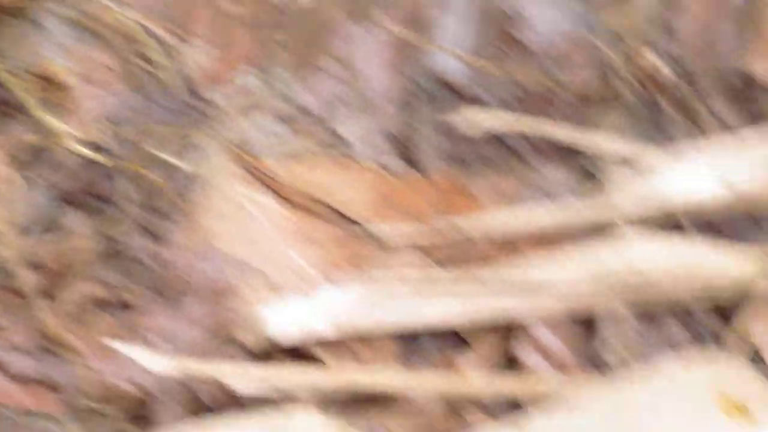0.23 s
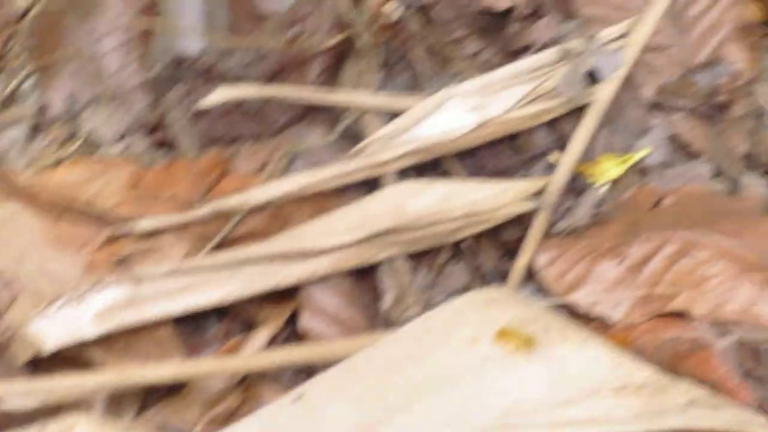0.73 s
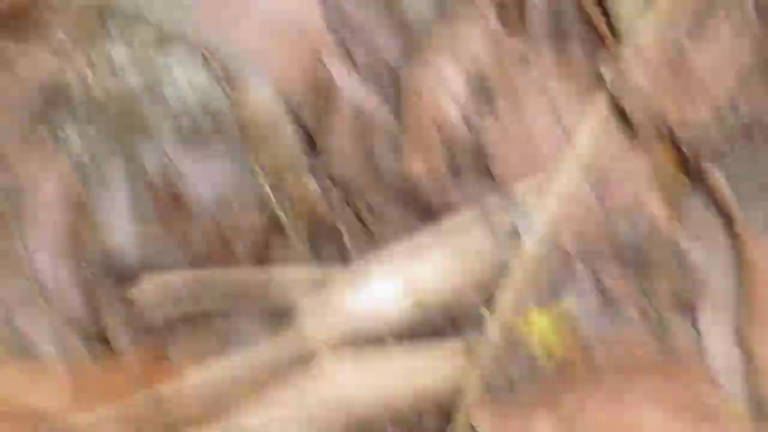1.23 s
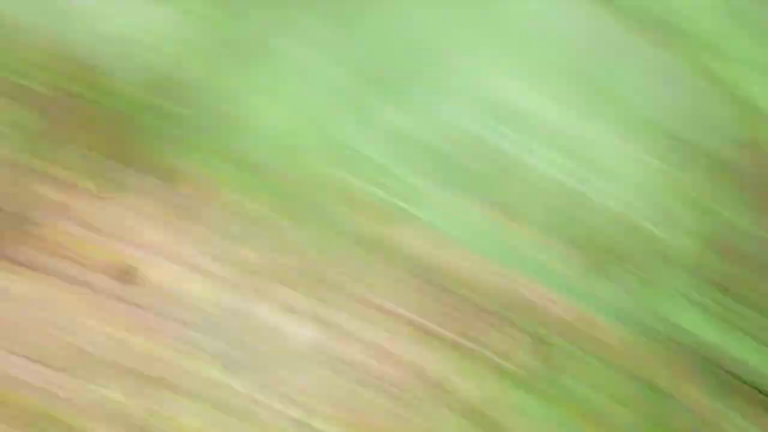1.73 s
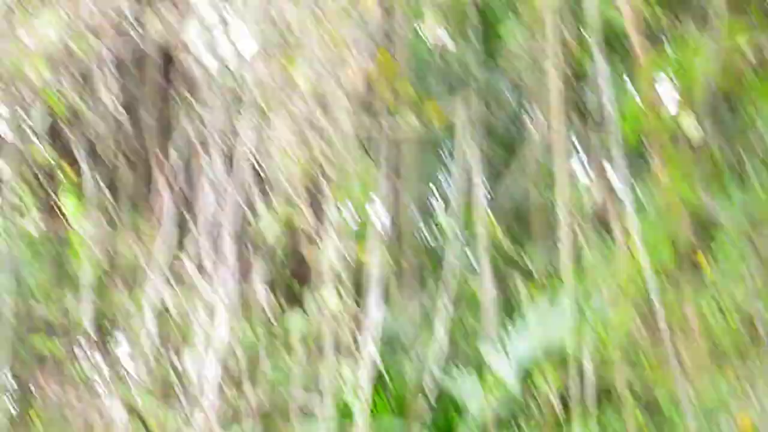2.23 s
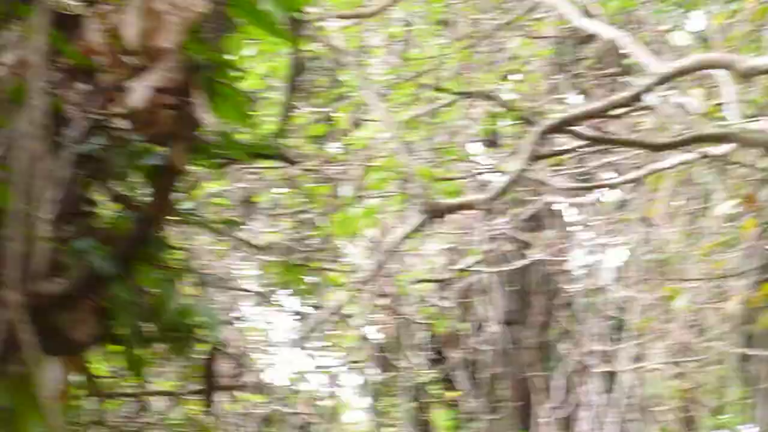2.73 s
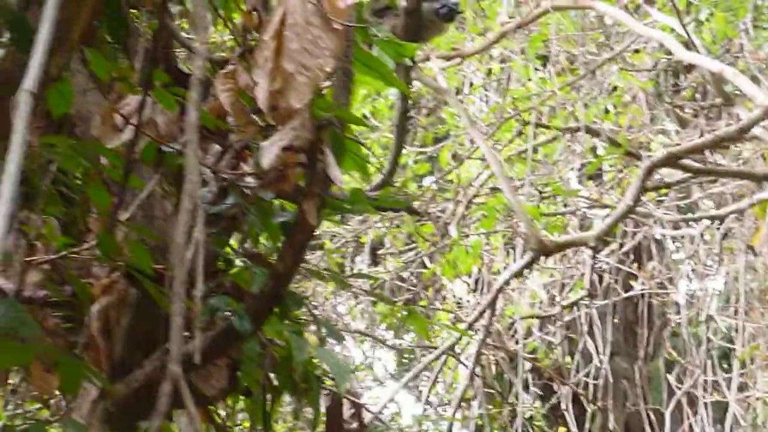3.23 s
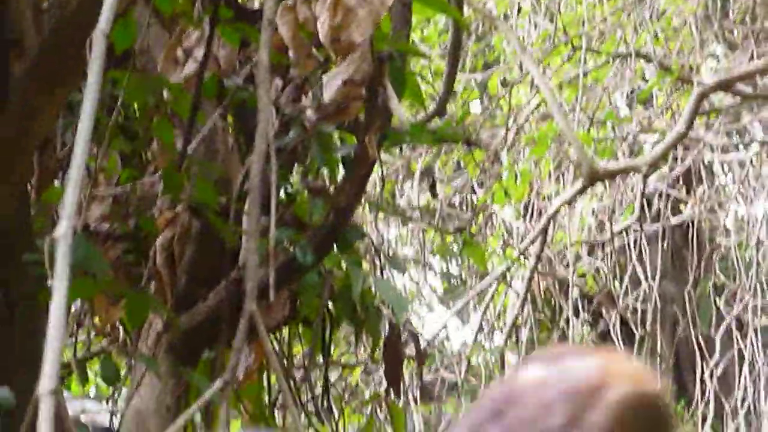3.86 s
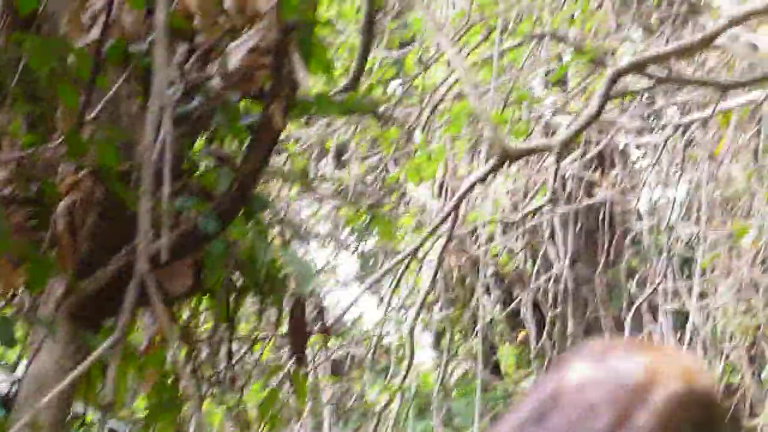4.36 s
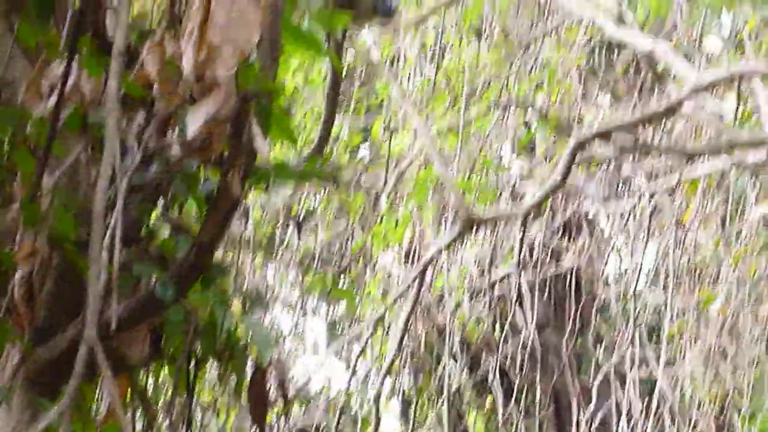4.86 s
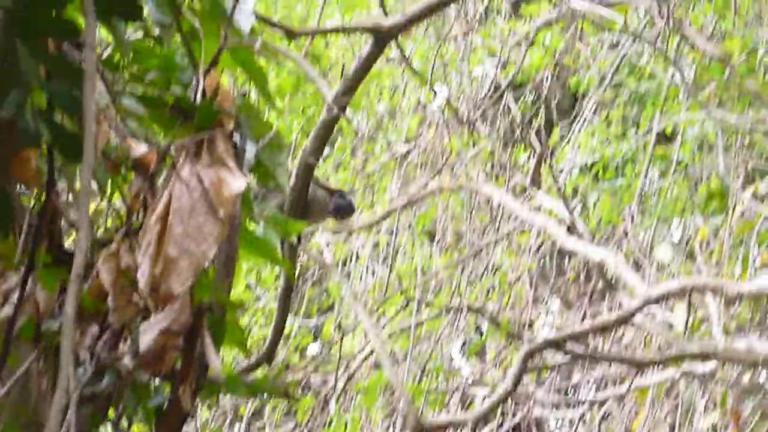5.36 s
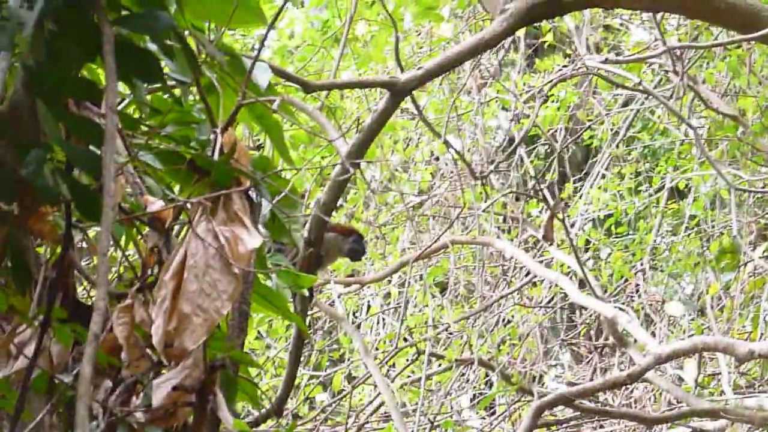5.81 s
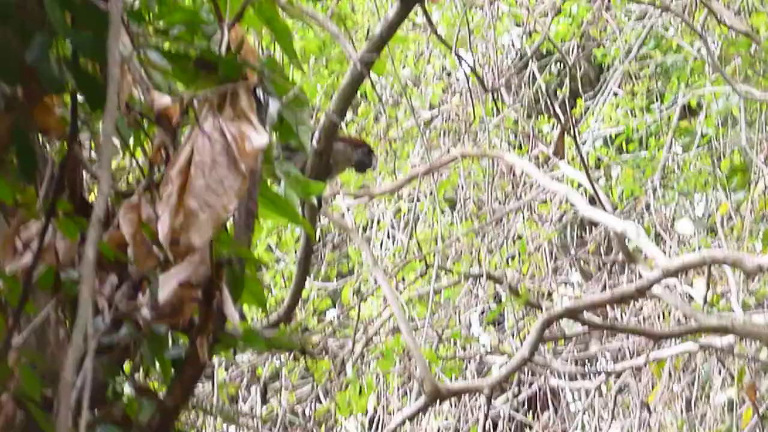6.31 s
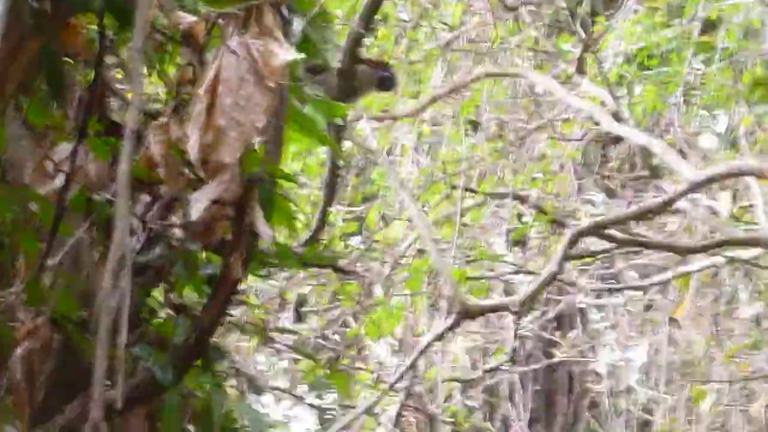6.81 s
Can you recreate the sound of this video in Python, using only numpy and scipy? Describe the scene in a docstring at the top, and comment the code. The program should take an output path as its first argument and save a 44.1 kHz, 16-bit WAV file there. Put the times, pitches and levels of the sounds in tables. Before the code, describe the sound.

Overlapping shrill tamarin chirps and faint slurred whistles among trees, with sharp twig cracks at the start and end and a low microphone thump.

```python
"""Forest air rumbles and foliage hisses throughout; at 0 s come soft whistles and the noisy tail end of a call.
Tamarin calls, frequency arches near 8 kHz that plunge at the end, overlap to 5.8 s; two more follow 6.8 s.
Twigs snap as damped rings and leaves crunch as shaped noise, up to 1.3 s and again from 6 s.
At the strongest snap, near 6.5 s, the microphone overloads, giving a low thump.
Noise-tail echoes add the forest; sampling at a low rate then folds the treble about half that rate."""
import sys
import numpy as np
from scipy import signal
from scipy.fft import rfft, irfft, next_fast_len
from scipy.io import wavfile
from scipy.ndimage import uniform_filter1d, map_coordinates

SR = 44100
rng = np.random.default_rng(int(sys.argv[2]) if len(sys.argv) > 2 else 0)


def dump(signal):
    """Clip the signal to [-1, 1] and save it as 16-bit WAV at the path in sys.argv[1]."""
    limited = np.clip(np.atleast_2d(signal).T, -1, 1)
    pcm = np.round(limited * 32767).astype(np.int16)
    wavfile.write(sys.argv[1], SR, pcm)


N = 312228


def amp(db):
    """Logarithmic level: decibels to amplitude gain."""
    return 10 ** (np.asarray(db) / 20)


def unit(x):
    """Normalisation: x scaled to rms 1."""
    return x / np.sqrt(np.mean(x ** 2) + 1e-20)


def along(points, hz):
    """Interpolation of (f/Hz, value) points on a logarithmic frequency axis."""
    f, v = np.transpose(points)
    return np.interp(np.log(hz + 1), np.log(f + 1), v)


def over_time(points):
    """Linear interpolation of (t/s, value) points at every sample."""
    return np.interp(np.arange(N) / SR, *np.transpose(points))


def add(track, s, sound):
    """Superposition: mixes a sound into the track from time s."""
    start = int(np.clip(round(s * SR), 0, N - 1))
    track[start:start + len(sound)] += sound[:N - start]


def wobble(rate, size):
    """Band-limited randomness: a smooth curve through rate random knots a second."""
    knots = rng.standard_normal(size // 40 + 8)
    # the spline is read at every eighth sample, then joined by lines
    coarse = np.arange(0, size + 8, 8)
    curve = map_coordinates(knots, [coarse * rate / SR], mode="mirror")
    return np.interp(np.arange(size), coarse, curve)


def filtered(x, response):
    """Linear filtering: the spectrum of x times a response of frequency."""
    m = next_fast_len(len(x) + 4096)
    return irfft(rfft(x, m) * response(np.fft.rfftfreq(m, 1 / SR)), m)[:len(x)]


def coloured(x, spectrum):
    """Spectral shaping: x through a gain curve of (f/Hz, level/dB) points."""
    return filtered(x, lambda hz: amp(along(spectrum, hz)))


def swell(t, length):
    """Critically damped pulse: rises to 1 at the given length, then dies away."""
    u = t / max(length, 1e-5)
    return u * np.exp(1 - u)


def glide(times, values, t, smooth):
    """Piecewise-linear contour, its corners rounded by two moving averages of smooth seconds."""
    line = np.interp(t, np.maximum.accumulate(times), values)
    width = max(int(smooth * SR), 1)
    return uniform_filter1d(uniform_filter1d(line, width), width)


# reverberation time of the late echoes: f/Hz, t60/s
FOREST = [(500, 0.06), (2500, 0.72), (6000, 0.59), (9000, 0.73)]
# what trunks and leaves throw back: f/Hz, level/dB
SCATTER = [(500, -2.5), (2500, -1), (6000, 0.5), (7200, 0.5), (8500, -2)]


def echoes(sound, early_db, late_db, early_t60=0.1, rise=0.0046):
    """Diffuse reverberation: near leaves give a short noise tail, trunks farther off a longer one."""
    hz, t, z = signal.stft(rng.standard_normal(SR * 3 // 4), SR, nperseg=256)
    build_up = 1 - np.exp(-t / rise)
    z = z * amp(along(SCATTER, hz))[:, None] * build_up
    late_t60 = along(FOREST, hz)[:, None]
    tail = 0
    for db, t60 in (early_db, early_t60), (late_db, late_t60):
        decay = signal.istft(z * amp(-60 * t / t60), SR, nperseg=256)[1]
        tail = tail + amp(db) * decay / np.linalg.norm(decay)
    return signal.fftconvolve(sound, tail)


# slow level of the rumble, before its lift and wobble: t/s, level/dB
AIR = [(0.1, -53), (0.31, -59), (1.19, -55), (1.83, -58), (2.31, -53), (2.8, -60), (3.56, -59),
       (3.99, -52.5), (4.45, -56.5), (4.67, -52.5), (5.66, -54.5), (6.28, -51.5), (6.57, -56.5),
       (7.08, -58)]
# relative spectrum of the moving air: f/Hz, level/dB per Hz
RUMBLE = [(15, -44), (25, 3), (33, -10.5), (65, -1.5), (177, 0), (281, -1.5), (323, -3.5), (503, -8),
          (839, -10.5), (1500, -17.5), (1700, -18), (2210, -25.5), (3740, -120)]
# relative spectrum of the foliage: f/Hz, level/dB per Hz
HISS = [(900, -30), (1600, -7.5), (2300, -7.5), (3500, 1.5), (5500, 0.5), (7500, 1.5), (9000, -6.5)]
HISS_DB = -62  # middle level of the foliage


def air(rumble_db=1, hiss_grows=0.53):
    """Shaped broadband noise: uneven moving air under foliage hiss that stirs a little with it."""
    low = over_time(AIR)
    rumble_level = low + rumble_db + 1.0 * wobble(12, N)
    rumble = unit(coloured(rng.standard_normal(N), RUMBLE)) * amp(rumble_level)
    hiss_level = HISS_DB + hiss_grows * (low - low.mean()) + 0.45 * wobble(8.9, N)
    hiss = unit(coloured(rng.standard_normal(N), HISS)) * amp(hiss_level)
    return rumble + hiss


def slur(length, start_hz, end_hz, db, settle=2.2, overtone_db=-26, waver=0.0071, flutter_db=3.0):
    """Frequency modulation: a note slides quickly off its first pitch and settles on its last."""
    u = np.linspace(0, 1, int(np.clip(length * SR, 64, SR // 2)))
    hz = end_hz + (start_hz - end_hz) * (1 - u) ** settle
    hz = hz * (1 + waver * wobble(82.7, SR // 2)[:len(u)])
    phase = 2 * np.pi * np.cumsum(hz) / SR
    flutter = flutter_db * wobble(62.6, SR // 2)[:len(u)]
    level = amp(db + flutter) * np.abs(np.sin(np.pi * u)) ** 0.24
    return level * (np.sin(phase) + amp(overtone_db) * np.sin(2 * phase))


# rms level of the farthest callers: t/s, level/dB
CHORUS = [(0, -68), (.7, -62), (1.3, -63.5), (2, -67), (3, -66), (4, -62), (4.599, -55), (5.299, -60),
          (5.8, -57.5), (6.3, -60), (6.6, -67), (7.08, -66)]


def chorus(count=700, centre_hz=2420, spread=.125, bend=.1, length=.04):
    """Incoherent superposition: the farthest whistles come so often that they blur into a haze."""
    out = np.zeros(N)
    for k, (late, high, slope) in enumerate(rng.standard_normal((count, 3))):
        s = (k + late / 2) * N / SR / count
        hz = centre_hz * np.exp(spread * high)
        start_hz = hz * np.exp(bend * (1 + slope))
        add(out, s, slur(length, start_hz, hz * (1 - bend / 2), 0, overtone_db=-12.5))
    haze = echoes(out, early_db=1.5, late_db=-4, early_t60=.12)[:N]
    return unit(haze) * amp(over_time(CHORUS))


# soft slurred whistles, with the second harmonics of two of them; level before flutter and path:
# t/s, length/s, start f/Hz, end f/Hz, level/dB
WHISTLES = [(0, 0.14, 1960, 1572, -58), (0.398, 0.078, 1984, 2098, -55), (0.652, 0.16, 1990, 2400, -57),
            (0.832, 0.06, 2220, 1990, -56.5), (0.947, 0.08, 2290, 1880, -64),
            (1.113, 0.15, 3040, 2867, -58), (1.159, .095, 2440, 1970, -54), (1.526, 0.056, 3440, 3270, -61),
            (1.59, 0.18, 2530, 2166, -60), (1.734, 0.15, 2470, 2680, -58), (2.229, 0.087, 1940, 1828, -57),
            (2.36, .18, 2275, 2500, -58.5), (2.752, 0.11, 2380, 2297, -54), (2.949, 0.2, 1995, 2098, -57.5),
            (3.166, 0.066, 2470, 2600, -55.5), (3.293, 0.09, 1716, 2380, -54.5),
            (3.335, 0.085, 2950, 2830, -62), (3.367, 0.21, 2504, 2198, -52),
            (3.696, 0.086, 2200, 2376, -57.5), (3.781, 0.26, 2400, 2304, -48),
            (4.266, 0.048, 3070, 2960, -58), (4.354, 0.06, 2360, 1950, -50.5),
            (4.372, 0.027, 4280, 3890, -39.5), (4.376, 0.076, 2070, 2420, -49),
            (4.435, 0.07, 2174, 1950, -45), (4.841, 0.072, 2244, 2330, -56),
            (4.999, 0.14, 3010, 2860, -57.5), (5.007, .198, 2250, 1945, -50),
            (5.245, .075, 3900, 3740, -62), (5.251, 0.068, 1800, 1870, -56),
            (5.353, 0.073, 2640, 2690, -56.5), (5.521, 0.17, 2280, 1996, -47),
            (5.53, 0.15, 4370, 4160, -53.5), (5.532, 0.13, 3180, 2740, -51),
            (5.669, 0.13, 2040, 2320, -48.5), (5.681, 0.218, 1915, 1846, -52), (6.16, .16, 2730, 2490, -54),
            (6.2, 0.094, 5200, 4950, -59), (6.326, 0.15, 4750, 4390, -59)]
# short nearby squeaks and the rising onsets of some calls; level before flutter:
# t/s, length/s, start f/Hz, end f/Hz, level/dB
SQUEAKS_AND_ONSETS = [(.712, 0.025, 3270, 4050, -49), (0.725, 0.018, 4080, 4660, -35.5),
                      (0.735, 0.012, 4650, 4170, -37), (1.318, 0.02, 6320, 7140, -31.5),
                      (1.739, 0.034, 6170, 6870, -35), (3.088, 0.016, 4660, 6000, -47),
                      (4.66, 0.022, 5950, 5250, -41.5), (4.676, 0.011, 5280, 4610, -33),
                      (4.686, .07, 5070, 4930, -48), (4.779, 0.029, 4320, 5860, -40.5),
                      (7.062, 0.025, 4930, 6950, -48.5)]


def whistles(direct_db=-1):
    """Direct-to-reverberant ratio: deep-forest notes linger in echoes; near squeaks and onsets are drier."""
    out = np.zeros(N)
    for s, *shape in WHISTLES:
        note = slur(*shape)
        add(out, s, amp(direct_db) * note)
        add(out, s, echoes(note, early_db=-25.0, late_db=-6.0))
    for s, *shape in SQUEAKS_AND_ONSETS:
        note = slur(*shape, settle=1.8, waver=0.015)
        add(out, s, note)
        add(out, s, echoes(note, early_db=-14, late_db=-23))
    return out


# leaf crunches, and at 0 s the noisy tail end of a call: t/s, level/dB, time to the peak/s
NOISE_BURSTS = [(0, -37, 0.0042), (.439, -47.5, 0.02), (0.48, -50, 0.02), (0.758, -58, 0.044),
                (.913, -54, 0.013), (6.128, -54.5, 0.034), (6.223, -55.5, 0.04), (6.302, -36.5, 0.006),
                (6.317, -52, 0.0067), (6.352, -54, 0.031)]
# relative spectrum of breaking leaves and splinters: f/Hz, level/dB
CRUNCH = [(150, -39), (550, -9.5), (1200, -1.5), (1800, -9.5), (3000, 1), (5000, -1), (8000, -3.5),
          (12000, -21.5)]
# relative spectrum of the litter below: f/Hz, level/dB
KNOCK = [(100, -4), (400, -11), (800, -4), (1250, -5), (1800, -11), (4000, -42.5)]


def noise_bursts(spiky_db=4, litter_db=-9):
    """Crackling noise: grains of unequal size over a dull body give leaf crunches and a call's tail end."""
    out, t = np.zeros(N), np.arange(SR // 3) / SR
    for s, db, length in NOISE_BURSTS:
        grains = rng.standard_normal(len(t)) * amp(spiky_db * wobble(1200, len(t)))
        body = unit(coloured(grains, CRUNCH)) + amp(litter_db) * unit(coloured(grains, KNOCK))
        add(out, s, amp(db) * swell(t, length) * unit(body))
    return out


CLIMB_HZ_PER_S2 = 570000  # how tightly the pitch arches up to the crest
PLUNGE_HZ, PLUNGE_S = 4932, .0205  # pitch passed in the plunge, its time constant
# part of the drop made by the slow sag; the rest comes in a knee, wider in calls that sag longer
SAG_SHARE, KNEE_S, USUAL_SAG_S = .48, 0.0071, 0.0617


def chirp_pitch(t, sag, crest_hz):
    """Frequency contour about the plunge: an arch, a slow sag, a knee, then an exponential dive."""
    climb = CLIMB_HZ_PER_S2 * np.maximum(-t - sag, 0) ** 2
    knee = np.exp(np.minimum(t, 0) / (KNEE_S * np.sqrt(sag / USUAL_SAG_S)))
    dropped = SAG_SHARE * np.clip(1 + t / sag, 0, 1) ** 2 + (1 - SAG_SHARE) * knee
    before_dive = crest_hz - climb - (crest_hz - PLUNGE_HZ) * dropped
    return before_dive * np.exp(-np.maximum(t, 0) / PLUNGE_S)


# near calls, all of one shape, levels before smoothing and flutter:
# t of the plunge/s, length before it/s, sag from crest to plunge/s, crest f/Hz, peak level/dB, crest level/dB
CHIRPS = [(0.1226, .087, 0.05, 8180, -28.5, -37), (.327, 0.026, 0.024, 6500, -35, -47),
          (0.35, .096, 0.054, 8580, -31, -19.5), (.607, .112, 0.092, 8360, -29, -44),
          (0.679, .08, .03, 8360, -31.5, -35), (1.1, .061, .032, 8400, -37, -31.5),
          (1.2005, .098, 0.048, 8310, -28.5, -42), (1.378, .074, 0.037, 8480, -33, -29),
          (1.397, 0.057, 0.036, 8150, -28.5, -40), (1.612, .1, 0.09, 7880, -27, -43.5),
          (1.682, .048, 0.018, 7570, -39.5, -50), (1.754, .069, .044, 8530, -33, -28),
          (1.822, 0.054, .034, 8060, -27.5, -37), (2.138, .08, 0.055, 8160, -32, -35),
          (2.3134, 0.073, 0.047, 8530, -30.5, -25.5), (2.539, .128, 0.16, 8090, -28.5, -37.5),
          (2.765, .12, .08, 8500, -29.5, -32.5), (2.826, 0.13, 0.078, 8250, -29, -36),
          (2.961, .11, 0.11, 7990, -27.5, -41.5), (3.114, .062, 0.022, 8770, -35, -22.5),
          (3.2122, .123, 0.087, 7204, -25.5, -34.5), (3.416, .128, .093, 8480, -28.5, -23),
          (3.472, .11, 0.046, 7870, -28.5, -38), (3.663, 0.097, 0.02, 7300, -37, -42),
          (4.124, 0.074, .04, 7670, -35, -43.5), (4.251, .102, .074, 8490, -26, -20),
          (4.343, .065, .054, 8030, -27.5, -50), (4.538, .067, 0.024, 8450, -30.5, -35),
          (4.549, .093, 0.077, 7640, -28, -33), (4.777, .04, 0.015, 7650, -42.5, -51),
          (4.879, .1, 0.032, 7210, -29.5, -34), (4.91, .085, 0.06, 8230, -31, -27),
          (4.967, .13, 0.12, 8040, -24.5, -52.5), (5.431, .144, 0.12, 8446, -28, -22),
          (5.521, .053, .028, 8250, -33.5, -35), (5.642, .107, 0.05, 7630, -29.5, -40),
          (5.729, .111, .072, 7360, -24, -36.5), (6.808, .111, .084, 7770, -31, -53.5),
          (6.896, .087, 0.05, 8220, -29.5, -35.5)]
ONSET_DB = -14.5  # against the crest
SHOULDER_DB, HELD_DB, FALL_DB, END_DB = -4, -2.5, -17, -34.5  # against the peak
SHOULDER_S, ACCENT_S = 0.009, 0.0018  # shoulder and peak, before the plunge
FALL_S, TAIL_S = 0.0048, 0.021  # collapse and end of the voice, after the plunge


def chirps(overtone_db=-13, waver=0.0018, flutter_db=2.76, break_db=1.5, break_s=0.014,
           bounce_db=-15, bounce_delay=0.012):
    """Joint frequency and amplitude modulation: a call crests, sags, bursts out and plunges over an octave."""
    out = np.zeros(N)
    for s, lead, sag, crest_hz, db, crest_db in CHIRPS:
        t = np.arange(-lead, TAIL_S, 1 / SR)
        hz = chirp_pitch(t, sag, crest_hz) * (1 + waver * wobble(200, SR // 4)[:len(t)])
        # the effort peaks near the plunge, then gives out
        times = [-lead, -sag, -SHOULDER_S, -ACCENT_S, 0, FALL_S, TAIL_S]
        levels = [crest_db + ONSET_DB, crest_db, db + SHOULDER_DB, db,
                  db + HELD_DB, db + FALL_DB, db + END_DB]
        level = glide(times, levels, t, smooth=0.0014)
        fade = np.clip((t + lead) / 0.0059, 0, 1) * np.clip((TAIL_S - t) / 0.0019, 0, 1)
        phase = 2 * np.pi * np.cumsum(hz) / SR
        voice = np.sin(phase) + amp(overtone_db) * np.sin(2 * phase)
        # the voice breaks up as it falls
        flutter = flutter_db * wobble(248.4, SR // 4)[:len(t)]
        breaking = np.clip(1 + t / break_s, 0, 1)
        flutter = flutter + break_db * breaking * wobble(496.4, SR // 4)[:len(t)]
        call = voice * fade * amp(level + flutter)
        add(out, s - lead, call)
        # one bounce off the nearest trunk beats against the gliding tone
        add(out, s - lead + bounce_delay * rng.uniform(0.4, 1), amp(bounce_db) * call)
        add(out, s - lead, echoes(call, early_db=-11.5, late_db=-13.0))
    return out


# twigs and dry leaves; the knock is relative to the snap and halved in amplitude:
# t/s, ring level/dB, ring f/Hz, time to the ring's peak/s, knock level/dB
SNAPS = [(0.1197, -23.5, 4500, 0.00062, -27), (0.2812, -22, 3760, 0.00069, -10),
         (0.4399, -31, 3690, 0.0023, -10), (0.503, -46.5, 2480, .0015, 12), (0.61, -37, 3540, 0.00094, 0),
         (0.7664, -25.5, 3990, 0.00052, -12.5), (0.9326, -20.5, 4200, 0.00015, -10),
         (1.0996, -19, 4150, 0.00057, -14.5), (1.2637, -16.5, 4550, 0.00028, -22),
         (6.0137, -38.5, 2830, 0.00091, -11), (6.157, -30.5, 3200, 0.000099, -1.5),
         (6.3069, -21, 4970, 0.00029, -24), (6.3136, -12, 5660, 0.000055, -23),
         (6.392, -40.5, 1016, 0.0021, -7), (6.4818, -8, 3700, 0.00023, -13),
         (6.6478, -11, 3640, 0.00014, -12.5), (6.731, -46.5, 2120, 0.00079, -1),
         (6.8036, -23, 2930, 0.00045, -11), (6.9705, -16.5, 3240, 0.00042, -7)]


def snaps(upper=1.8, upper_db=-8, ragged=1.87, splinter_db=-18, splinter_life=0.0022, knock_life=0.00087):
    """Damped resonance: a breaking fibre rings raggedly, with splinters and a dull knock from the litter."""
    out, t = np.zeros(N), np.arange(SR // 20) / SR
    for s, db, hz, length, knock_db in SNAPS:
        phase = 2 * np.pi * hz * t + ragged * wobble(740, len(t))  # ragged in radians
        ring = swell(t, length) * (np.sin(phase) + amp(upper_db) * np.sin(upper * phase))
        splinter_noise = unit(coloured(rng.standard_normal(len(t)), CRUNCH))
        splinters = amp(splinter_db) * swell(t, splinter_life / 2 + length / 2) * splinter_noise
        knock_noise = unit(coloured(rng.standard_normal(len(t)), KNOCK))
        knock = amp(knock_db) / 2 * swell(t, knock_life) * knock_noise
        snap = amp(db) * (ring + splinters + knock)
        add(out, s, snap)
        add(out, s, echoes(snap, early_db=-27.0, late_db=-37.0))
    return out


def thump(s=6.4815, db=-33, length=0.0066):
    """Overload: at the strongest snap the microphone gives a low thump, set here as a one-sided pulse."""
    out = np.zeros(N)
    add(out, s, amp(db) * swell(np.arange(SR // 10) / SR, length))
    return out


def scene():
    """Superposition of calls near and far, snaps, thump, noise bursts and the forest air."""
    return (chirps() + whistles() + chorus() + snaps() + thump() + noise_bursts() + air())[None]


# the converter's slow filter, applied before and after sampling: f/Hz, level/dB
BAND_EDGE = [(6500, 0), (7500, -2.5), (8000, -7), (8500, -16.5), (9000, -38), (10000, -85)]
SAMPLING_HZ = 16000
TOP_HZ = 9300  # nothing passes above


def record(dry, offset=0.011):
    """Aliasing: slow filters let treble fold about half the sampling rate; the converter sits off zero."""
    # sampling multiplies by a pulse train; its mean and first harmonic suffice here
    mirror = 1 + 2 * np.cos(2 * np.pi * SAMPLING_HZ * np.arange(N) / SR)
    sampled = coloured(coloured(dry[0], BAND_EDGE) * mirror, BAND_EDGE)
    return (filtered(sampled, lambda hz: hz < TOP_HZ) + offset)[None]


dry = scene()
out = record(dry)
dump(out)
```